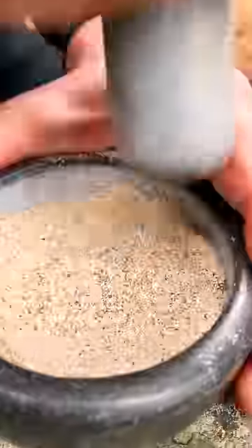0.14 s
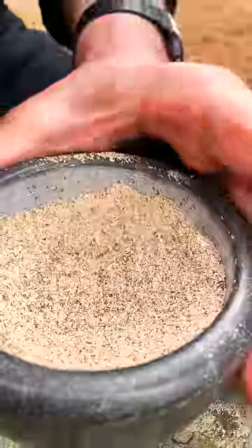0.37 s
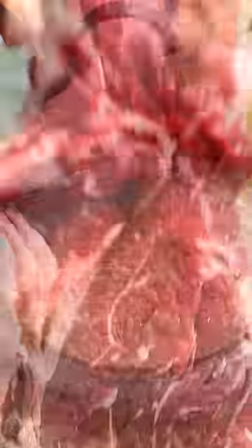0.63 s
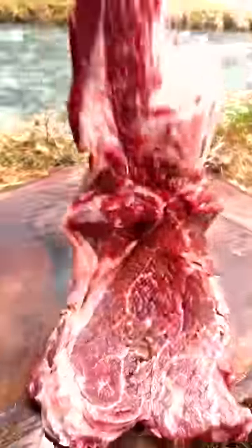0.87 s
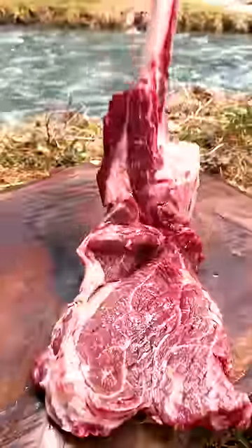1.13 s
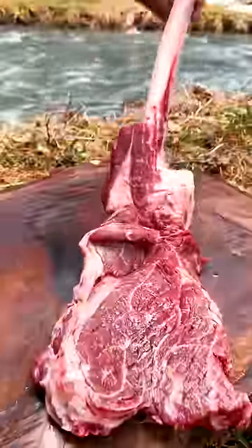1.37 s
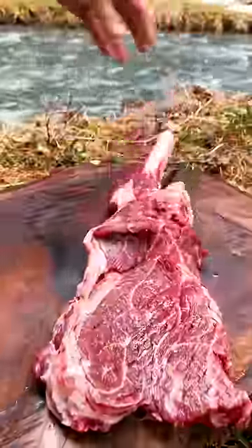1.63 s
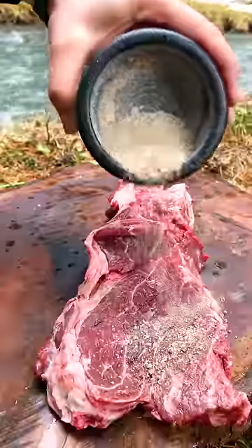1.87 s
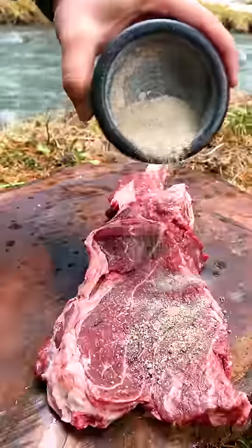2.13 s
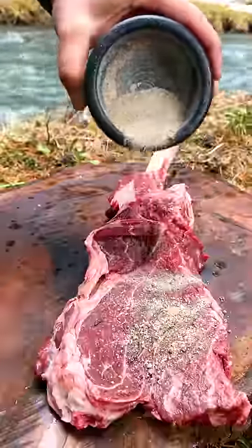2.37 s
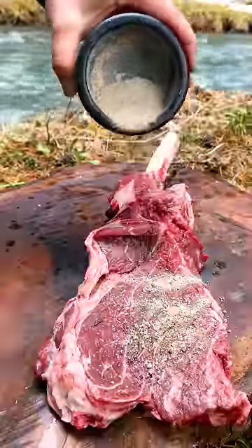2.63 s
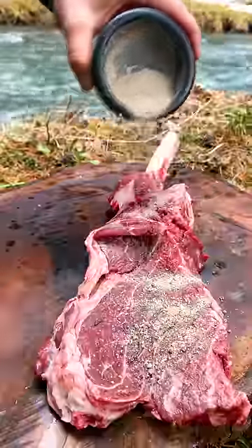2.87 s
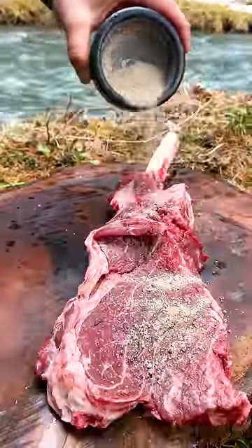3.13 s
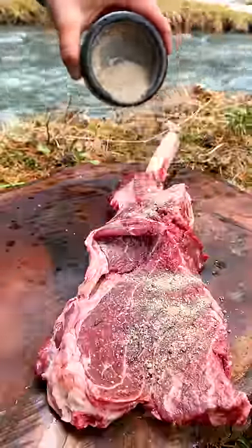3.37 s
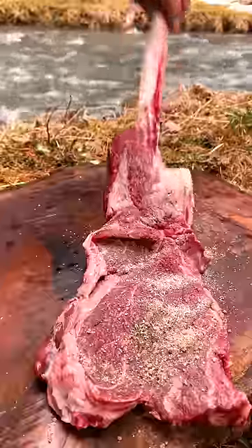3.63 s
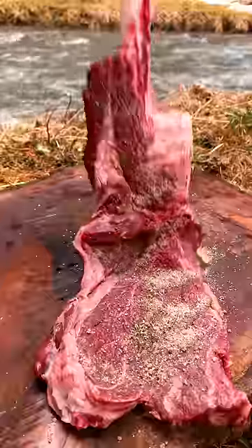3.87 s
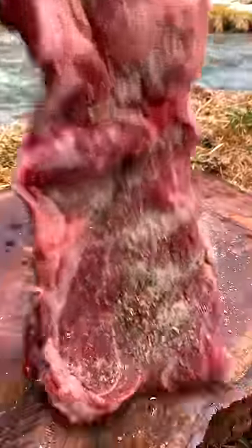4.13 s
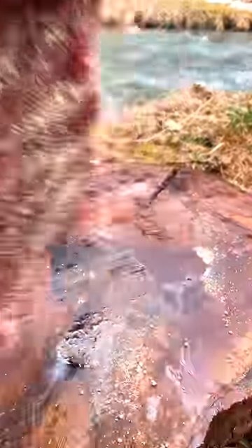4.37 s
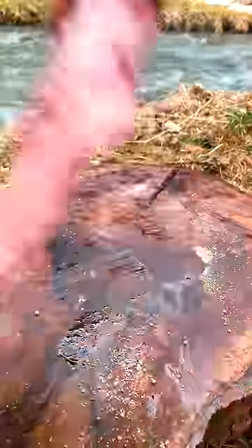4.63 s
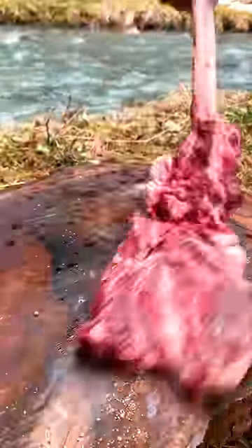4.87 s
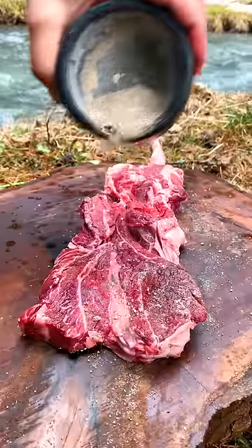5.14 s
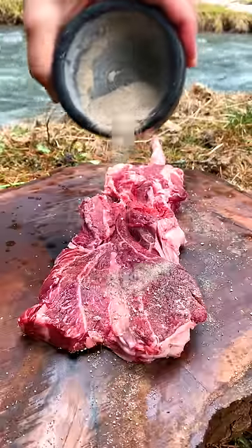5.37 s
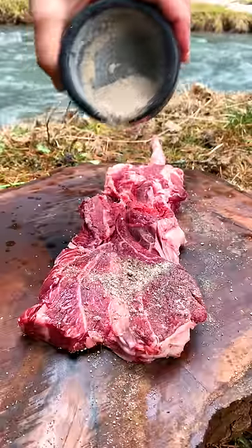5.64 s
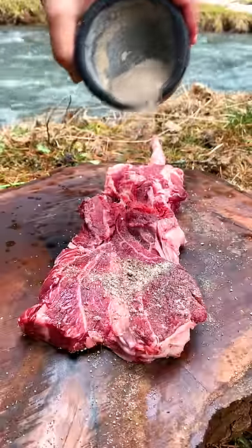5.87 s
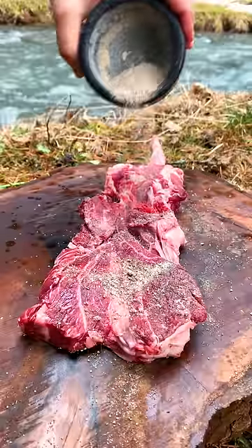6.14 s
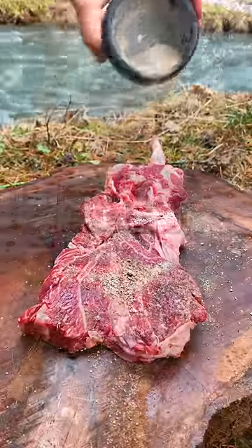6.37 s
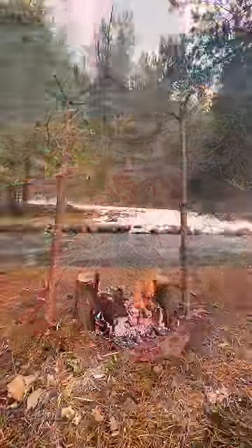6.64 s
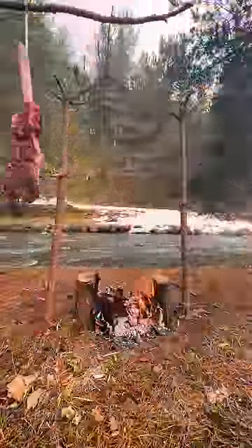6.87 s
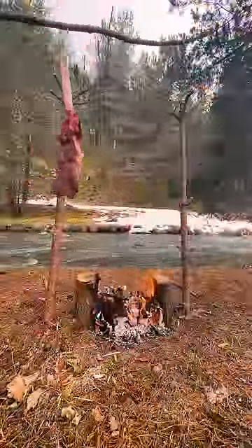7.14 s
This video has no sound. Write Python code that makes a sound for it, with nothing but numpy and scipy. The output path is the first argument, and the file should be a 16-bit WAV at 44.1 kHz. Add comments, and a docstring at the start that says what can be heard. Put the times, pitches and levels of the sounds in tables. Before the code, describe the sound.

Close beside a fast, bubbling stream with hissing spray. A brief gritty grind ends in two sharp stone knocks from a pestle in a mortar, then a quick rattle and hard clack as the mortar hits a wooden slab. Tiny salt ticks follow, later a short wet crackle of meat peeling off. Finally a wider view, with a crisp fire pop.

```python
"""A fast stream (coloured noise, ringing bubbles, spray hiss) and air buffeting run throughout. Grains grind
and settle in a mortar, salt ticks (noise bursts), then a stone pestle knocks and the mortar meets a wooden
slab (struck modes). Later wet meat peels off the slab in two pulls of crackle. The last view is further off,
where a fire pops (ringing clicks with hiss). Two close ports hear the water with a pitch-dependent phase shift."""
import sys
import numpy as np
from scipy import signal
from scipy.fft import rfft, irfft
from scipy.io import wavfile
from scipy.ndimage import uniform_filter1d

SR = 44100
rng = np.random.default_rng(int(sys.argv[2]) if len(sys.argv) > 2 else 0)


def wav_record(signal):
    """Record a signal, one row per channel, as 16-bit PCM in the file named by sys.argv[1]."""
    frames = np.transpose(np.atleast_2d(signal))
    bounded = np.clip(frames, -1, 1)
    # unit amplitude maps onto the largest positive 16-bit level
    quanta = np.round(bounded * 32767).astype(np.int16)
    wavfile.write(sys.argv[1], SR, quanta)


def makeup_ratio(level_db):
    """Linear amplitude ratio for a level in decibels (20 dB per factor of ten)."""
    decades = np.asarray(level_db, float) / 20
    return 10 ** decades


N = 320166
FAR_VIEW_S = 6.56

# water and air at the ports: (time [s], roar level [dB], spray level [dB], buffeting level [dB])
WATER_LEVELS = [(0, -36, -40, -44), (.07, -57, -46.5, -49), (.1, -44, -51, -58), (.3, -45, -50.5, -61),
                (.6, -45, -45.5, -62), (.63, -41.5, -46, -62), (1.2, -40, -46.5, -63),
                (3.5, -40.5, -46, -69), (6.4, -40.5, -47, -67), (6.7, -40, -45.5, -58),
                (7.26, -40.5, -44.5, -59)]
# ends of the mortar view and of the next; the gain restarts at rest: (time [s])
VIEW_ENDS_S = [.622, 1.803]


def rms_one(x):
    """Scale to rms 1."""
    return x / np.sqrt(np.mean(x ** 2) + 1e-20)


def in_time(rows):
    """Columns of a curve table at every sample."""
    s, *columns = np.transpose(rows)
    return [np.interp(np.arange(N) / SR, s, c) for c in columns]


def at_hz(points):
    """A spectrum table on the FFT grid, interpolated over log frequency."""
    hz = np.arange(N // 2 + 1) * SR / N + 1
    point_hz, value = np.transpose(points)
    return np.interp(np.log(hz), np.log(point_hz + 1), value)


def colour(x, points):
    """Filter by a dB spectrum."""
    return irfft(rfft(x) * makeup_ratio(at_hz(points)), N)


def band(x, low_hz, high_hz):
    """Butterworth band-pass."""
    return signal.sosfilt(signal.butter(2, [low_hz, high_hz], "band", fs=SR, output="sos"), x)


def drift(rate_hz):
    """Slow chance of rms 1: noise through two equal low-pass poles, run at every 40th sample."""
    r = np.exp(-80 * np.pi * rate_hz / SR)
    noise = rng.standard_normal(N // 40 + 2002)
    slow = signal.lfilter([1], [1, -2 * r, r * r], noise)[2000:]
    return np.interp(np.arange(N) / 40, np.arange(len(slow)), rms_one(slow))


def ring(clicks, hz, t60_s):
    """Two-pole resonator: a unit click starts a dying sine of initial height 1."""
    r, w = makeup_ratio(-60 / (t60_s * SR)), 2 * np.pi * hz / SR
    return signal.lfilter([0, np.sin(w)], [1, -2 * r * np.cos(w), r * r], clicks + 1e-18)


def grains(per_s, spread_db):
    """Random clicks of uneven size and either sign."""
    sizes = makeup_ratio(spread_db * np.minimum(rng.exponential(1, N), 5)) * rng.choice([-1, 1], N)
    return sizes * (rng.random(N) < per_s / SR)


def churn(bubbles_per_s, bubble_db):
    """Tumbling water: noise in surging bands, plus bubbles that each die 60 dB in 22 cycles."""
    white, edges_hz = rng.standard_normal(N), np.geomspace(30, 18000, num=11)
    surge_db = 1.5 * drift(1.05)
    tumble = np.zeros(N)
    for low_hz, high_hz in zip(edges_hz, edges_hz[1:]):
        flutter_db = 3.3 * min(1, 3500 / high_hz) * drift(10.2)
        tumble += band(white, low_hz, high_hz) * makeup_ratio(surge_db + flutter_db)
    born, pitch_index = grains(bubbles_per_s, 1.95), rng.integers(0, 16, N)
    bubbles = np.zeros(N)
    for k, hz in enumerate(np.geomspace(220, 2600, num=16)):
        bubbles += ring(born * (pitch_index == k), hz, 22.2 / hz)
    return rms_one(tumble) + makeup_ratio(bubble_db) * rms_one(bubbles)


def stream():
    """Roar of tumbling water and hiss of spray: one part shared by the ports, one of each port's own."""
    # (frequency [Hz], level [dB per Hz])
    roar_spectrum = [(40, -40.5), (70, -32), (125, -3), (250, -9.5), (500, 1), (1000, 0), (1700, -4.5),
                     (2400, -8.5), (3500, -15.5), (6000, -16), (12000, -42)]
    # (frequency [Hz], level [dB per Hz])
    spray_spectrum = [(1500, 8), (3000, -1), (5000, -4.5), (7000, -5.5), (9500, -6.5), (12000, -6),
                      (15000, -13.5)]
    roar_db, spray_db, _ = in_time(WATER_LEVELS)
    parts = []
    for _ in range(3):
        roar = rms_one(colour(churn(900, bubble_db=-3.5), roar_spectrum))
        droplets = rng.standard_normal(N) + 0.49 * rms_one(grains(500, 4.2))
        spray = rms_one(colour(droplets, spray_spectrum))
        parts.append(makeup_ratio(roar_db) * roar + makeup_ratio(spray_db + 1.35 * drift(22)) * spray)
    return parts[0], np.array(parts[1:])


def buffet():
    """Lumpy low noise with low swells, partly shared by the ports, and soft bumps that swell and die."""
    # low bumps through the ground: (time [s], click level [dB], frequency [Hz])
    bump_rows = [(.089, -28, 61.5), (4.84, -34, 47.3), (6.66, -38, 70.5), (7.2, -35, 85)]
    # low swells: air gusts, and at .53 the low thud after the pestle knock;
    # gain added to the noise: (time [s], peak [dB], Gaussian half length [s])
    swell_rows = [(0.098, -37, 0.023), (.53, -51, .035), (4.35, -55, 0.043), (4.84, -57, .06),
                  (5.09, -57, .03), (6.668, -60, 0.045), (7.016, -53, 0.053)]
    t = np.arange(N) / SR
    noise = band(band(rng.standard_normal((3, N)), 46, 87), 39, 100)
    lumps = rms_one(noise[0] + .55 * noise[1:])
    bumps = np.zeros(N)
    for s, click_db, hz in bump_rows:
        click = makeup_ratio(click_db) * (np.arange(N) == int(s * SR))
        bumps += ring(ring(click, hz, 0.18), hz, 0.1) * 110 / SR
    low_swells = sum(makeup_ratio(db) * np.exp(-.5 * ((t - s) / half_s) ** 2) for s, db, half_s in swell_rows)
    swing_db = 1.5 * drift(4.5)
    return (makeup_ratio(in_time(WATER_LEVELS)[2] + swing_db) + low_swells) * lumps + bumps


def grinding():
    """Push of crushed grains: dense light contacts; the stroke weakens and stops, the grains settle."""
    t = np.arange(N) / SR
    stroke = makeup_ratio(-52.5 - 650 * t) * (t < 0.031)   # falls 650 dB/s
    settling = makeup_ratio(-85) * (t < 0.083)
    return (stroke + settling) * rms_one(band(grains(3700, 3.1), 950, 4500))


def ticks():
    """Salt grains and wet fibres: milliseconds of dying noise around a pitch, with some top treble."""
    # clearest ticks: (time [s], peak [dB], centre [Hz], top treble re centre band [dB])
    clear = [(0.1397, -36.5, 3500, -12), (0.2325, -34.5, 7800, -7), (0.6392, -37, 6470, -11),
             (0.704, -28, 6850, -20), (1.939, -27, 4200, -22), (3.5058, -35.5, 5970, -17),
             (3.8494, -37.5, 7040, -6), (3.939, -33.5, 6400, -7), (4.8144, -34, 4500, -3),
             (5.0756, -26.5, 8800, -5), (5.079, -32, 7970, -2), (5.6207, -37, 3710, -1),
             (5.859, -39, 7610, -6), (6.23, -34, 4140, -6)]
    faint_low_hz, faint_high_hz = 3300, 6500
    faint = []
    for a, b, c in rng.random((12, 3)):
        hz = faint_low_hz * (faint_high_hz / faint_low_hz) ** c ** 2
        faint.append((a * FAR_VIEW_S, -39 + 1.5 * (4 * b - 2), hz, -8))
    rows, length = clear + faint, 900
    out, t = np.zeros(N + length), np.arange(length) / SR
    bursts = rng.standard_normal((len(rows), length)) * np.exp(-t / 0.0011)
    for (s, peak_db, hz, top_db), burst in zip(rows, bursts):
        tick = band(burst, hz * 0.92, hz * 1.22) + makeup_ratio(top_db) * band(burst, 5600, 15000)
        out[int(s * SR):int(s * SR) + length] += makeup_ratio(peak_db) * tick / np.abs(tick).max()
    return out[:N]


def knocks(rows, modes, lag_s, swell_cycles, rubbing=0):
    """Gaussian pushes strike every mode, which swells and rings out; long contacts sound dull."""
    push, out, t = np.zeros((2, N)) + rubbing, np.zeros((2, N)), np.arange(300) / SR
    light = signal.butter(2, 1300, "high", fs=SR, output="sos")
    for s, push_db, contact_ms, weight, pan_db in rows:
        shape = np.exp(-.5 * (t / (contact_ms / 1000) - 3) ** 2)
        shape = shape / shape.sum()
        # light contacts leave the low modes still
        shape = weight * shape + (1 - weight) * signal.sosfilt(light, shape)
        port_db = push_db + pan_db * np.array([[.5], [-.5]])
        push[:, int(s * SR):int(s * SR) + len(t)] += makeup_ratio(port_db) * shape
    for k, (hz, level_db, t60_s) in enumerate(modes):
        ringing = ring(push, hz, t60_s)
        swell = ring(ringing, hz, 7 * swell_cycles / hz) * 2 * hz / (swell_cycles * SR)
        out += (-1) ** k * makeup_ratio(level_db) * swell
    out[1] = np.interp(np.arange(N) - lag_s * SR, np.arange(N), out[1])   # right port hears it later
    return out


def pestle_in_mortar():
    """Grinding and stone knocks excite the mortar's modes; all fades out as the mortar view ends."""
    # (time [s], push level [dB], contact [ms], weight [0-1], left-right [dB])
    pestle_rows = [(.4873, -26, 0.11, 0.6, -9), (.4981, -2, 0.047, 0.7, -4), (.5083, -21, 0.068, .9, -11),
                   (.6058, 4, 0.11, 0.7, -3)]
    # (frequency [Hz], level [dB], t60 [s])
    mortar_modes = [(105, -16, 0.048), (191, -12, 0.058), (310, -8.5, 0.019), (510, -7, 0.014),
                    (745, -11.5, .015), (990, -11, 0.0054), (1316, 5, 0.019), (1680, 7, 0.0033),
                    (2365, -20, 0.025), (3420, -8.5, 0.0026), (5590, -14, 0.028)]
    fade = np.clip((VIEW_ENDS_S[0] - np.arange(N) / SR) / 0.0073, 0, 1)
    return knocks(pestle_rows, mortar_modes, .00004, 0.63, grinding()) * fade


def rattle():
    """Rows of six light touches, ever closer and stronger, counted back from the last."""
    end_s, gap_s, gap_growth = 1.6553, .0013, 1.2
    last_db, step_db, contact_ms, weight, pan_db = -9.5, 5, 0.043, 0.079, -6
    back_s = np.cumsum([0] + [gap_s * gap_growth ** k for k in range(5)])
    return [(end_s - s, last_db - step_db * k, contact_ms, weight, pan_db) for k, s in enumerate(back_s)]


def mortar_on_slab():
    """A rattle leads into full blows and their bounce; little sounds below about 170 Hz."""
    # first touch, blows, bounce: (time [s], push level [dB], contact [ms], weight [0-1], left-right [dB])
    blow_rows = [(1.6448, -29, 0.072, 0.2, -10), (1.657, -2.5, 0.29, 1, -4.5),
                 (1.6596, -5.5, 0.26, 0.9, -8.5), (1.6947, -23, 0.13, 0.74, -6), (1.7, -20, 0.32, 0.7, -4)]
    # (frequency [Hz], level [dB], t60 [s])
    slab_modes = [(226, -8.5, 0.063), (340, -19.5, 0.086), (446, -4, 0.078), (573, 2.5, 0.029),
                  (744, 5, 0.037), (866, 8.5, 0.046), (1204, -0.5, 0.026), (1520, -7.5, 0.027),
                  (1815, 3.5, 0.028), (2090, -4, 0.044), (2486, -1, 0.019), (3580, -6, 0.0058),
                  (4350, -10, 0.014), (6300, -11, 0.0057)]
    return band(knocks(rattle() + blow_rows, slab_modes, .00009, 0.37), 170, 12100)


def peel():
    """Dense wet crackle while the meat tears free in two pulls."""
    # (time [s], peak of the level curve [dB], decay [dB/s])
    pull_rows = [(4.816, -37, 450), (4.864, -40.5, 170)]
    t, rise_db_s = np.arange(N) / SR, 1100
    wet = rms_one(grains(5300, 2.1)) + 0.55 * rng.standard_normal(N)
    crackle = rms_one(band(wet, 2200, 19000))
    pulls = np.zeros(N)
    for s, peak_db, decay_db_s in pull_rows:
        pulls += makeup_ratio(peak_db - np.maximum(rise_db_s * (s - t), decay_db_s * (t - s)))
    return pulls * crackle


def fire():
    """Pops ring over all pitches, spit briefly and leave a thin hiss of escaping gas."""
    # (time [s], click level [dB])
    pop_rows = [(6.98, -41), (6.989, -43), (6.9971, -18), (7.0012, -29), (7.0034, -32), (7.008, -40),
                (7.013, -39)]
    # (frequency [Hz], level [dB], t60 [s])
    pop_modes = [(90.5, -19, 0.056), (171, -10.5, 0.035), (550, -8, 0.019), (1540, -2, 0.01),
                 (2500, -14, 0.0027), (4100, 0, 0.003), (6460, 6, 0.0041), (9120, 12.5, 0.0033),
                 (11400, 5.5, .008), (15200, 1, 0.008)]
    clicks, burst = np.zeros(N), np.zeros(N)
    for s, click_db in pop_rows:
        clicks[int(s * SR)] = makeup_ratio(click_db)
    for k, (hz, level_db, t60_s) in enumerate(pop_modes):
        burst += makeup_ratio(level_db) * ring(clicks, hz, t60_s) * (-1) ** k
    # exponential envelopes, time constants 2.2 and 32 ms
    spit = signal.lfilter([1], [1, -np.exp(-1 / (0.0022 * SR))], clicks) * makeup_ratio(5.5)
    gas = signal.lfilter([1], [1, -np.exp(-1 / (0.032 * SR))], clicks) * makeup_ratio(-14.5)
    spit_noise = band(rng.standard_normal(N), 4170, 16000)
    gas_noise = band(rng.standard_normal(N), 6700, 15000)
    return burst + spit_noise * spit + gas_noise * gas


def ports(shared, own, phase, balance_db, lag_s):
    """Mix shared and own parts; the ports differ by a lag and a pitch-dependent phase; either may lead."""
    # (frequency [Hz], shared part of the power [0-1])
    likeness = [(60, 0.92), (300, 0.82), (800, 0.47), (2000, 0.6), (4000, 0.33), (6500, 0.96),
                (15000, 0.97)]
    alike = at_hz(likeness)
    both = np.sqrt(alike) * rfft(shared) + np.sqrt(1 - alike) * rfft(own)
    left_lead = at_hz(phase) + 2 * np.pi * lag_s * np.arange(N // 2 + 1) * SR / N
    turn = np.exp(.5j * left_lead) * makeup_ratio(balance_db / 2)
    return irfft(both * [turn, 1 / turn], N)


def scene():
    """Near views of mortar and slab, then a quick fade to the far view by the fire."""
    # view bent over the mortar: (frequency [Hz], gain [dB])
    mortar_colour = [(100, 0.5), (300, 3), (600, 0.5), (1000, -3.5), (1700, -1), (4000, 0.5), (12000, 0)]
    # (frequency [Hz], left lead beyond the lag [rad])
    near_phase = [(0, 0), (100, .9), (600, .7), (1500, -1.14), (2600, -1.0), (3700, -2.9), (4900, -2.6),
                  (6000, -1.95), (16500, -2.0)]
    # (frequency [Hz], left-right [dB])
    near_balance = [(60, -0.5), (150, -5), (380, -6), (950, -1.5), (2380, -1.0), (5980, 0.5), (15000, -0.5)]
    # (frequency [Hz], gain [dB])
    far_colour = [(60, 3.5), (300, -1), (1000, -5), (3000, -1.5), (9000, -0.5), (12000, -6.5), (15000, 4)]
    # (frequency [Hz], left lead [rad])
    far_phase = [(0, 0), (780, .6), (2240, -.2), (3900, .3), (5000, -.8), (8300, -1.5), (10300, -1.7),
                 (11200, -2.9), (14200, -3.3), (16000, -4.3)]
    t = np.arange(N) / SR
    far = np.clip((t - FAR_VIEW_S) / 0.0047, 0, 1)
    shared, own = (np.where(t < VIEW_ENDS_S[0], colour(x, mortar_colour), x) for x in stream())
    small, pops = ticks() + peel(), fire()
    near_view = ports(shared + small, own + small, near_phase, at_hz(near_balance), lag_s=.000185)
    far_shared, far_own = colour(shared, far_colour) + pops, colour(own, far_colour) + pops
    far_view = ports(far_shared, far_own, far_phase, 0, lag_s=0)
    views = (1 - far) * near_view + far * far_view
    return views + pestle_in_mortar() + mortar_on_slab() + buffet()


def gain_control(x, threshold_db, slope, release_db_s, attack_s):
    """Loud peaks pull the gain down at the attack rate; it creeps back, and restarts at VIEW_ENDS_S."""
    level_db = 10 * np.log10(uniform_filter1d(np.mean(x ** 2, axis=0), size=300) + 1e-12)
    gain_db, r = [], np.exp(-1 / (attack_s * SR))
    for part_db in np.split(level_db, [int(s * SR) for s in VIEW_ENDS_S]):
        ramp_db = release_db_s * np.arange(len(part_db)) / SR
        excess_db = slope * np.maximum(part_db - threshold_db, 0)
        held_db = np.maximum.accumulate(excess_db + ramp_db) - ramp_db
        gain_db.append(-signal.lfilter([1 - r], [1, -r], np.maximum(held_db, 0)))
    return x * makeup_ratio(np.concatenate(gain_db))


def roll_off(x):
    """The treble ends steeply here."""
    return signal.sosfilt(signal.butter(12, 16510, fs=SR, output="sos"), x)


def record(dry):
    """Gain control, then bass and top cut."""
    even = gain_control(dry, threshold_db=-17.5, slope=1.0, release_db_s=69, attack_s=0.01)
    even = signal.sosfilt(signal.butter(2, 40, "high", fs=SR, output="sos"), even)
    even = signal.sosfilt(signal.cheby2(12, 50, 16100, fs=SR, output="sos"), even)
    return roll_off(even)


dry = scene()
out = record(dry)
wav_record(out)
```